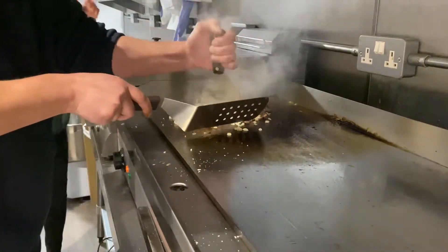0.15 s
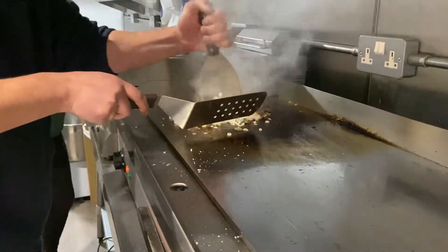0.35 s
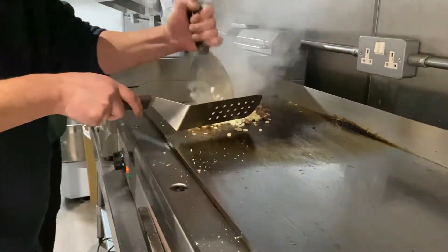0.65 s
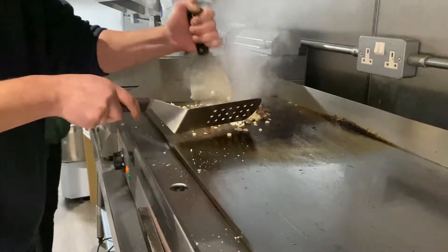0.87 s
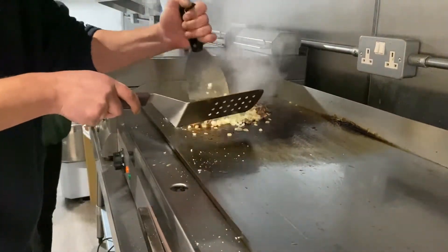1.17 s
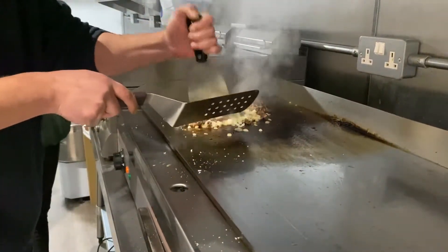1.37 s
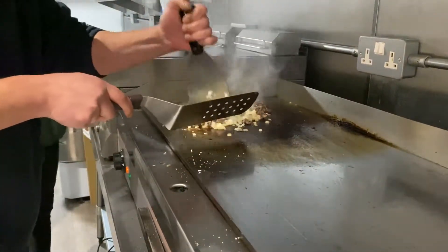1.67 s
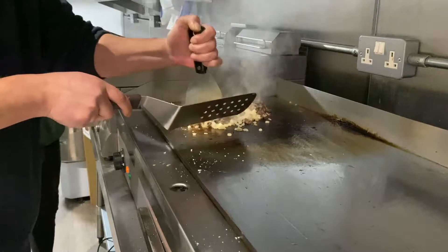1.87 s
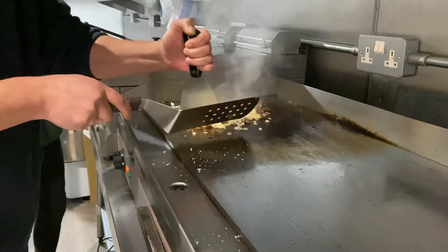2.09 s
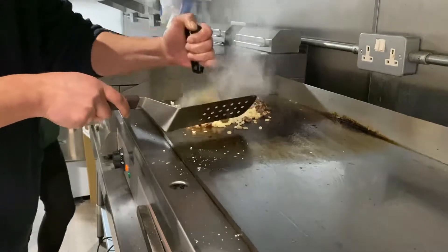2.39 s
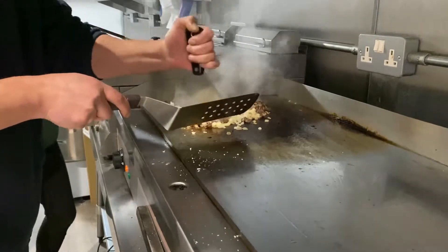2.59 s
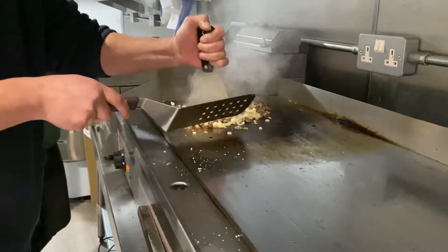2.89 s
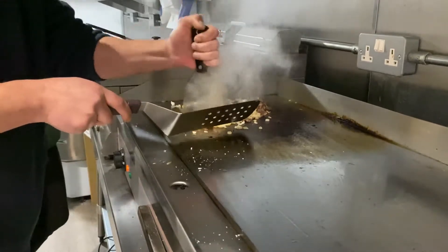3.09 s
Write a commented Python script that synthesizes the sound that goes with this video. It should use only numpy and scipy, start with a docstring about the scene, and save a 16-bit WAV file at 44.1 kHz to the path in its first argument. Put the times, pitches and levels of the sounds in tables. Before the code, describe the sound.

Twelve evenly spaced metal clacks, each with a dull thump and brief clangy ring, over continuous sizzling and fan hum that dip after each blow; close stereo pickup in a reflective steel kitchen.

```python
"""A small hard-walled kitchen: a steel spatula chops food on a hot griddle, nearly four blows a second.
Each blow rings plate and blade as decaying sines, over noise bursts for clack and edge and a dull thump.
Filtered echoes off the steel surround and a decaying noise tail make the room.
The food sizzles as grainy shaped noise; the extractor is low noise with a wavering hum.
Both sink after each blow and swell towards the next."""
import sys
import numpy as np
from scipy import signal
from scipy.fft import rfft, irfft
from scipy.io import wavfile

SR = 44100
rng = np.random.default_rng(int(sys.argv[2]) if len(sys.argv) > 2 else 0)


def unload_wav(signal):
    """Save mono or channel-first audio to the path in sys.argv[1] as 16-bit WAV at rate SR, clipped to [-1, 1]."""
    wavfile.write(
        sys.argv[1],
        SR,
        np.round(np.clip(np.atleast_2d(signal).T, -1, 1) * 32767).astype(np.int16),
    )


N = 143325
TIME = np.arange(N) / SR
HZ = np.maximum(np.arange(N // 2 + 1) * SR / N, 1)


def from_db(db):
    """Decibels to gain."""
    return 10 ** (np.asarray(db) / 20)


def rms_one(x):
    """Scale to rms 1, over all channels together."""
    return x / np.sqrt(np.mean(x ** 2) + 1e-20)


def at_hz(points, hz):
    """Read a table on a log-frequency axis."""
    f, value = np.transpose(points)
    return np.interp(np.log(hz), np.log(f), value)


def at_time(points, s):
    """Read a table on a time axis."""
    return np.interp(s, *np.transpose(points))


def colour(x, spectrum):
    """Filter by a table of dB over Hz."""
    size = x.shape[-1]
    hz = np.maximum(np.fft.rfftfreq(size, 1 / SR), 1)
    return irfft(rfft(x) * from_db(at_hz(spectrum, hz)), size)


def bandpass(x, order, low_hz, high_hz):
    """Butterworth band-pass."""
    sos = signal.butter(order, [low_hz, high_hz], "band", fs=SR, output="sos")
    return signal.sosfilt(sos, x)


def drift(rate_hz):
    """Low-passed noise of rms 1."""
    return rms_one(irfft(rfft(rng.standard_normal(N)) / (1 + (HZ / rate_hz) ** 2), N))


def pair(two, alike):
    """Two unrelated signals become left and right with the given correlation, clipped to -1..1."""
    c = np.clip(alike, -1, 1)
    mid = np.sqrt((1 + c) / 2) * two[0]
    side = np.sqrt((1 - c) / 2) * two[1]
    return np.array([mid + side, mid - side])


def add(out, x, s):
    """Mix x in at time s."""
    i = max(int(s * SR), 0)
    out[:, i:i + x.shape[1]] += x[:, :out.shape[1] - i]


SINK_DB, SINK_GROWTH_DB_PER_S = 2.0, 1.5
SINK_FALL_S, SINK_HOLD_S, SINK_RECOVER_S = 0.028, 0.11, 0.096


def sink_db():
    """The background drops with each blow, stays low and swells again, deeper as the chopping goes on."""
    corners_s = np.cumsum([0, SINK_FALL_S, SINK_HOLD_S, SINK_RECOVER_S])
    dips_db = []
    for s, *_ in CHOPS:
        depth_db = SINK_DB + SINK_GROWTH_DB_PER_S * s
        dips_db.append(depth_db * np.interp(TIME - s, corners_s, [0, 1, 1, 0]))
    return -np.max(dips_db, axis=0)


# Spectrum of the extractor's air noise. Each row: frequency in Hz, relative level in dB per Hz.
FAN = [(20, -26), (35, -7), (52, 1), (70, 3.5), (95, -4.5), (130, 1.5), (185, -2), (240, -1.5), (300, -5.5),
       (420, -11), (600, -20.5), (1000, -19), (2000, -21.5), (5000, -33.5)]
# Right-channel filter of the extractor. Each row: frequency in Hz, gain in dB.
FAN_RIGHT = [(60, -4.5), (110, -5), (150, -16), (220, -12), (380, -6.5), (700, -7.5), (2000, -5.5)]
# Left-right correlation of the air noise. Each row: frequency in Hz, correlation before clipping to -1..1.
FAN_ALIKE = [(60, 0.76), (110, 0.44), (190, -1.49), (380, 0.84), (700, 0.66), (2000, -0.017)]
# Slow level of the air noise. Each row: time in seconds, offset in dB.
RUMBLE_LEVEL = [(0, 1.5), (.55, -1.5), (.9, 1.5), (1.5, 0), (2.3, 1), (3.25, -0.5)]
FAN_DB, FAN_WAVER_DB, FAN_WAVER_HZ = -25, 1.0, 2.7
FAN_SINKS = 0.56  # share of sink_db
HUM_HZ, HUM_DB, HUM_WIDTH_HZ = 299, -36, 9


def extractor():
    """Lumpy air rumble as shaped noise, with a hum: a sine widened by slow random amplitude and phase."""
    noise = rfft(rng.standard_normal((2, N)))
    air = rms_one(colour(irfft(pair(noise, at_hz(FAN_ALIKE, HZ)), N), FAN))
    air_db = FAN_DB + at_time(RUMBLE_LEVEL, TIME) + FAN_WAVER_DB * drift(FAN_WAVER_HZ)
    waver = drift(HUM_WIDTH_HZ) + 1j * drift(HUM_WIDTH_HZ)
    hum = rms_one(np.real(waver * np.exp(2j * np.pi * HUM_HZ * TIME)))
    both = from_db(air_db) * air + from_db(HUM_DB) * hum
    left, right = both * from_db(FAN_SINKS * sink_db())
    return np.array([left, colour(right, FAN_RIGHT)])


# Spectrum of the sizzle. Each row: frequency in Hz, relative level in dB per Hz.
SIZZLE = [(500, -2), (1000, -21.5), (1800, -4.5), (3000, 3), (5500, 3), (6400, 2), (7500, 2.5),
          (11000, 1.5), (13000, -1), (15500, -9.5), (16500, -20)]
# Slow level of the sizzle. Each row: time in seconds, level in dB before sinking and flicker.
SIZZLE_LEVEL = [(0, -27.5), (.17, -27), (.3, -28.5), (.6, -29), (.85, -25.5), (1.3, -28), (1.75, -27.5),
                (2.05, -30), (2.35, -28.5), (2.7, -29), (3.1, -30), (3.25, -30)]
# Right-channel filter of the sizzle. Each row: frequency in Hz, gain in dB against left.
SIZZLE_RIGHT = [(500, -72.5), (2400, -3.5), (4400, -6.5), (5800, -12), (6600, 0), (16000, 7)]
SIZZLE_FLICKER_DB, SIZZLE_FLICKER_HZ = 0.58, 17
SIZZLE_GRAIN_DB, SIZZLE_GRAIN_HZ = 1, 900
SIZZLE_ALIKE = 0.5  # left-right correlation


def sizzle():
    """Countless tiny steam bursts of uneven size merge into a hiss: noise with a fast random level."""
    bursts = rng.standard_normal((2, N)) * from_db(SIZZLE_GRAIN_DB * drift(SIZZLE_GRAIN_HZ))
    left, right = rms_one(colour(pair(bursts, SIZZLE_ALIKE), SIZZLE))
    flicker_db = SIZZLE_FLICKER_DB * drift(SIZZLE_FLICKER_HZ)
    level_db = at_time(SIZZLE_LEVEL, TIME) + sink_db() + flicker_db
    return from_db(level_db) * np.array([left, colour(right, SIZZLE_RIGHT)])


# Reflections off the steel surround.
# Each row: delay in seconds, lowest frequency in Hz, highest frequency in Hz, left gain, right gain.
ECHOES = [(.0068, 1500, 3000, 0.27, 0.24), (.0108, 457, 790, 0.56, 0.42), (0.0105, 1490, 2930, 0.1, 0.85),
          (.037, 120, 1150, 0.26, 0.15)]
# Level of the diffuse tail. Each row: frequency in Hz, level in dB.
ROOM = [(150, -7), (350, -17.5), (650, -4), (1100, -17.5), (1600, -6.5), (2300, -12.5), (3200, -9),
        (5000, -4.5), (12000, -26)]
# Decay of the diffuse tail. Each row: frequency in Hz, t60 in seconds.
ROOM_T60 = [(150, 0.15), (600, 0.47), (1200, 0.33), (1600, 0.33), (2250, 1), (3000, 0.14), (8000, 0.9)]
ROOM_DELAY_S = .018
ROOM_ALIKE = 0.36  # left-right correlation


def kitchen(x):
    """Near reflections, then a diffuse noise tail that dies band by band, drawn afresh for each blow."""
    out, t, tail = x.copy(), TIME[:x.shape[1]], 0
    for delay_s, low_hz, high_hz, left, right in ECHOES:
        add(out, bandpass(x, 1, low_hz, high_hz) * [[left], [right]], delay_s)
    edges_hz = np.geomspace(100, 16000, 13)
    for low_hz, high_hz in zip(edges_hz, edges_hz[1:]):
        hz = np.sqrt(low_hz * high_hz)
        decay = from_db(-60 * t / at_hz(ROOM_T60, hz))
        noise = pair(rng.standard_normal((2, len(t))), ROOM_ALIKE) * decay / np.linalg.norm(decay)
        tail = tail + from_db(at_hz(ROOM, hz)) * bandpass(noise, 2, low_hz, high_hz)
    add(out, signal.fftconvolve(x, tail, axes=1), ROOM_DELAY_S)
    return out


# Modes of plate and blade, one entry per mode: pitch in Hz, relative level in dB, base t60 in seconds.
MODE_HZ = [151, 184, 299, 419, 538, 576, 609, 730, 817, 888, 1020, 1095, 1159, 1315, 1480, 1760, 2018, 2182,
           2320, 2476, 2716, 4950]
MODE_LEVEL_DB = [-27, -21.5, -27.5, -10, -9, -27.5, -20.5, -12.5, -24, -8.5, -19, -8.5, -9, -0.5, -15, -24,
                 -28, -28.5, -19, -15, -23, -34.5]
MODE_T60_S = [0.63, 0.17, 0.064, 0.11, 0.069, 0.34, 0.15, 0.065, 0.25, 0.057, 0.037, 0.052, 0.085, 0.018,
              0.027, 0.016, 0.26, 0.23, 0.1, 0.035, 0.017, 0.081]
# How freely the blade rings. Each row: time in seconds, factor on the t60 of the blade modes.
BLADE_FREE = [(0, 0.35), (1.2, 0.58), (2.1, 0.85), (3.2, 0.76)]
BLADE_FROM_HZ = 1900
MODE_DB, MODE_RIGHT_DB, MODE_SCATTER_DB = -0.5, -6, 1.0
MODE_SPREAD_RAD, MODE_DETUNE = .9, .004  # right-channel phase spread, random pitch ratio
BENDING_LAG_S, BENDING_POWER = 0.00047, 1.343  # travel time through the plate at 1 kHz
BUILD_CYCLES = 1.92


def ring(t, s, landing, right_phase_rad):
    """Bending waves ring plate and blade: low notes arrive later and build up more slowly."""
    hz, db, t60_s = np.array([MODE_HZ, MODE_LEVEL_DB, MODE_T60_S])[:, :, None]
    age = np.maximum(t - BENDING_LAG_S * (1000 / hz) ** BENDING_POWER, 0)
    build = from_db(db + MODE_DB) * np.minimum(age * hz / BUILD_CYCLES, 1)
    ring_s = t60_s * np.where(hz > BLADE_FROM_HZ, at_time(BLADE_FREE, s), 1)
    scatter_db = MODE_SCATTER_DB * rng.standard_normal(hz.shape)
    strength = build * from_db(at_hz(landing, hz) - 60 * age / ring_s + scatter_db)
    turn = 2 * np.pi * hz * age * (1 + MODE_DETUNE * rng.standard_normal(hz.shape))
    modes = strength * np.sin([turn, turn + right_phase_rad])
    return modes.sum(1) * from_db([[0], [MODE_RIGHT_DB]])


# The plate's dense, quickly damped modes. Each row: frequency in Hz, relative level in dB per Hz.
CLACK = [(120, -32), (300, -8), (600, 2.5), (850, 3), (1100, 2.5), (1300, -9.5), (1550, -7.5), (2000, 0),
         (2400, 3.5), (2750, -5.5), (3300, -20), (4100, -14.5), (5200, -9), (6500, -17.5), (9000, -20),
         (16000, -45)]
CLACK_DB, CLACK_T60_S, CLACK_HOLD_S, CLACK_RISE_S = -11.5, 0.088, 0.0066, 0.00023
CONTACT_ALIKE, CONTACT_RIGHT_DB = .5, -8.5  # noise correlation; right level of clack, thump and tick


def contact_noise(t):
    """White noise pair for the impact."""
    return pair(rng.standard_normal((2, len(t))), CONTACT_ALIKE)


def clack(t, landing):
    """Modes too dense to tell apart: shaped noise, held briefly, then damped."""
    decay_db = -60 * np.maximum(t - CLACK_HOLD_S, 0) / CLACK_T60_S
    envelope = from_db(CLACK_DB + decay_db) * (1 - np.exp(-t / CLACK_RISE_S))
    spread = np.sqrt(np.mean(from_db(at_hz(CLACK, HZ)) ** 2))
    return colour(colour(contact_noise(t), CLACK), landing) / spread * envelope


THUMP_HZ, THUMP_DB, THUMP_PEAK_S, THUMP_WIDTH_S = 335, -6, 0.00495, 0.0021


def thump(t, db):
    """The weight of the hand follows the edge: a short low sine under a bell envelope."""
    after = t - THUMP_PEAK_S
    bell = np.exp(-(after / THUMP_WIDTH_S) ** 2)
    return from_db(db + THUMP_DB) * bell * np.sin(2 * np.pi * THUMP_HZ * after)


# Spectrum of the edge tick. Each row: frequency in Hz, relative level in dB per Hz.
TICK = [(1500, -71), (3200, 30.5), (5500, -1), (8000, 13.5), (16000, -27)]
TICK_DB, TICK_PEAK_S, TICK_WIDTH_S = -13, 0.0039, 0.00067


def edge_tick(t, db):
    """The edge grits on the steel: a very short burst of bright noise."""
    bell = np.exp(-((t - TICK_PEAK_S) / TICK_WIDTH_S) ** 2)
    return from_db(db + TICK_DB) * bell * rms_one(colour(contact_noise(t), TICK))


# The blows; every column but the first is used relative to its mean.
# Each row: start in seconds, level in dB, then colour in dB: thump, low knock, high knock, clank,
# blade ring, edge tick.
CHOPS = [(0.199, -2.5, -16, -15.5, -19.5, -5.5, -15, -16), (0.482, -4, -11.5, -18, -17, -4.5, -12, -18),
         (0.756, -3.5, -16, -23, -23.5, -9, -17.5, -28), (1.015, -3, -13, -19, -22, -4, -14, -20.5),
         (1.287, -4.5, -12.5, -12, -22, -4, -14.5, -17.5),
         (1.547, -2.5, -13.5, -20, -20.5, -6.5, -12.5, -21), (1.816, -5, -11.5, -19.5, -21, -2.5, -10, -19),
         (2.077, -5.5, -10.5, -16, -20.5, -3.5, -10, -15), (2.348, -3.5, -10.5, -16, -21, -5, -12, -19.5),
         (2.599, -1.5, -11.5, -19.5, -21, -7.5, -11.5, -19.5),
         (2.854, -5.5, -11, -17.5, -17.5, -3.5, -8.5, -14),
         (3.115, -2, -13.5, -20, -22.5, -7.5, -13, -19.5)]


def chops():
    """Every blow rings the same modes over tick, clack and thump, coloured by how the edge lands."""
    out, t = np.zeros((2, N)), TIME[:SR // 2]
    rows = np.array(CHOPS)
    rows[:, 1:] -= rows[:, 1:].mean(0)
    right_phase_rad = MODE_SPREAD_RAD * rng.standard_normal((len(MODE_HZ), 1))
    for s, level, thump_db, low_knock, high_knock, clank, blade, tick in rows:
        landing = [(430, thump_db), (520, low_knock), (600, low_knock), (700, high_knock),
                   (800, high_knock), (880, clank), (1400, clank), (2000, blade), (2900, blade),
                   (4000, tick)]  # Hz, dB
        contact = clack(t, landing) + thump(t, thump_db) + edge_tick(t, tick)
        contact = contact * from_db([[0], [CONTACT_RIGHT_DB]])
        blow = ring(t, s, landing, right_phase_rad) + contact
        add(out, from_db(level) * kitchen(blow), s)
    return out


def scene():
    """Chops in the room, over sizzle and extractor."""
    return extractor() + sizzle() + chops()


PAIR_JOIN_HZ, PAIR_TURN_HZ, PAIR_LAG_S = 6400, 7000, .000238
CUTOFF_HZ = 15900


def record(dry):
    """Peaks are rounded; in the top treble both channels carry one signal, the left late; the top is cut."""
    rounded = dry / (1 + (np.abs(dry) / .9) ** 6) ** (1 / 6)
    left, right = rfft(rounded)
    mid = (left + right) / 2
    joined = 1 / (1 + (PAIR_JOIN_HZ / HZ) ** 30)
    late = np.exp(-2j * np.pi * PAIR_LAG_S * np.maximum(HZ - PAIR_TURN_HZ, 0))
    both = np.array([(left + joined * (mid - left)) * late, right + joined * (mid - right)])
    return irfft(both / np.sqrt(1 + (HZ / CUTOFF_HZ) ** 200), N)


dry = scene()
out = record(dry)
unload_wav(out)
```